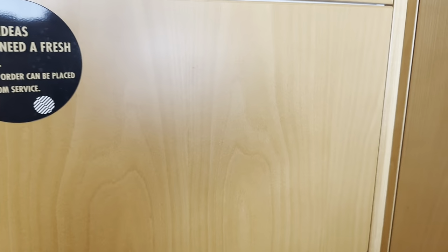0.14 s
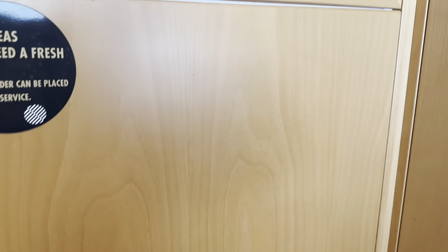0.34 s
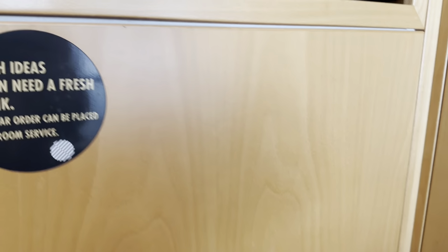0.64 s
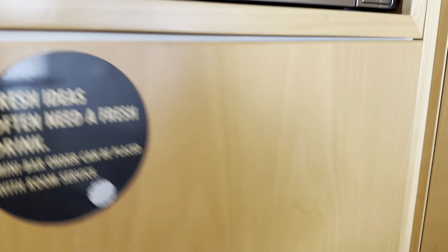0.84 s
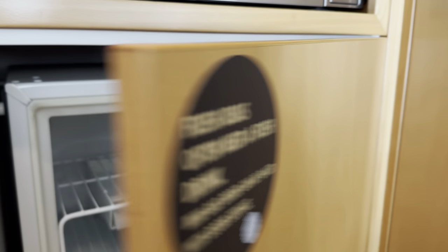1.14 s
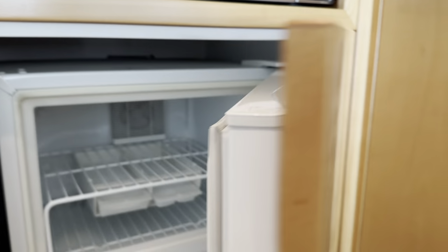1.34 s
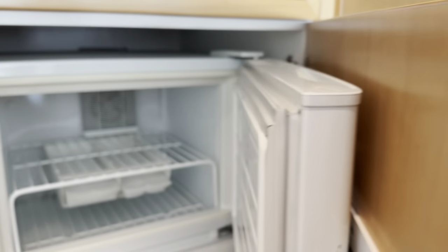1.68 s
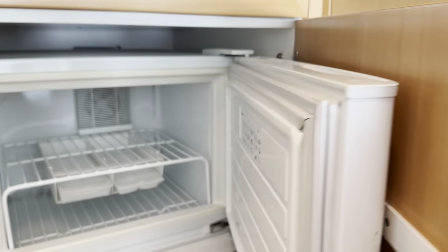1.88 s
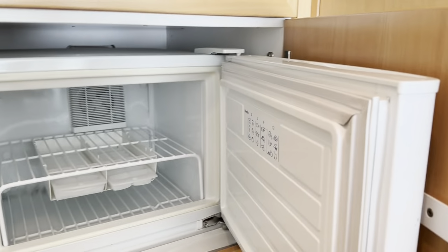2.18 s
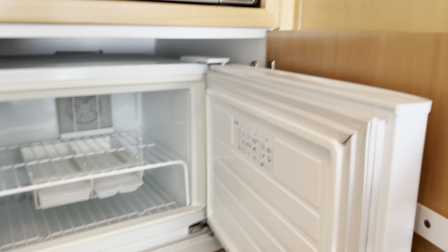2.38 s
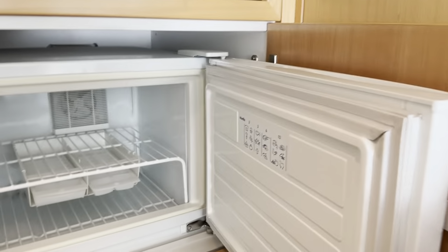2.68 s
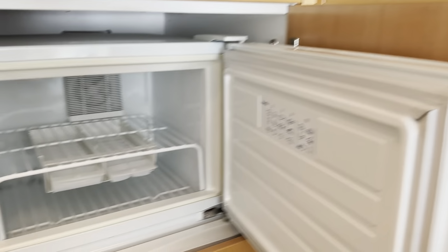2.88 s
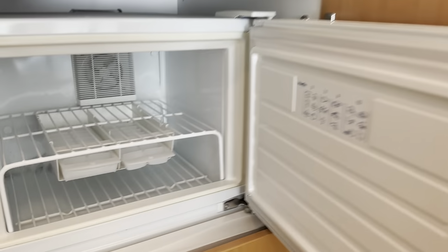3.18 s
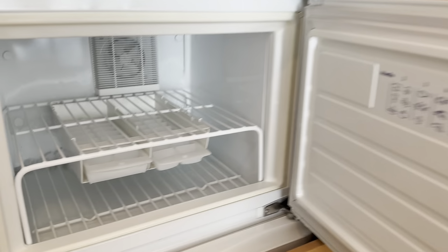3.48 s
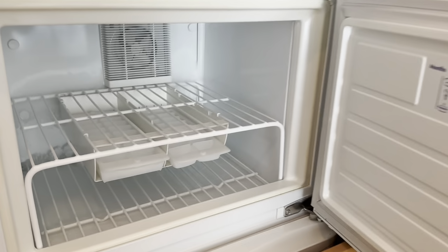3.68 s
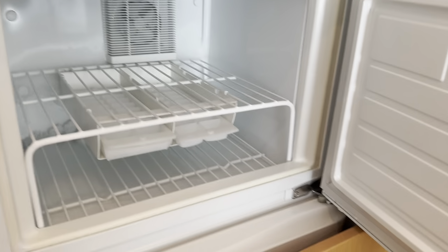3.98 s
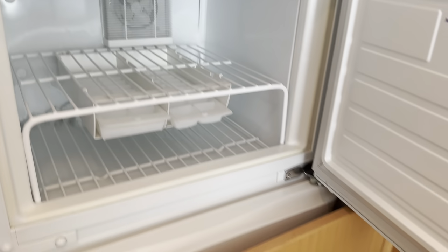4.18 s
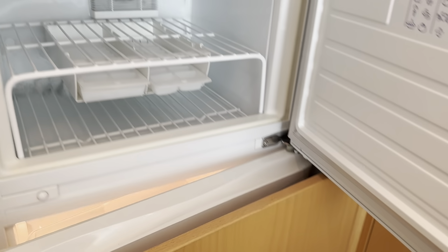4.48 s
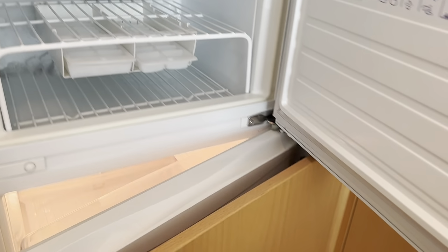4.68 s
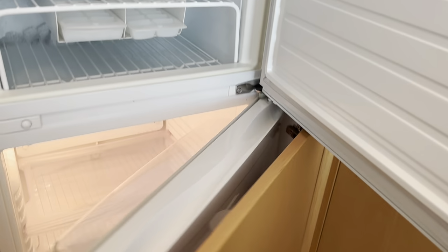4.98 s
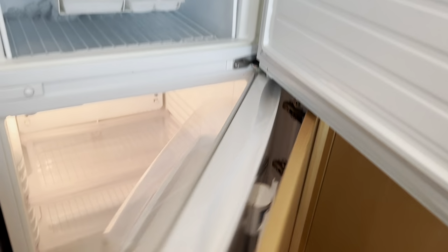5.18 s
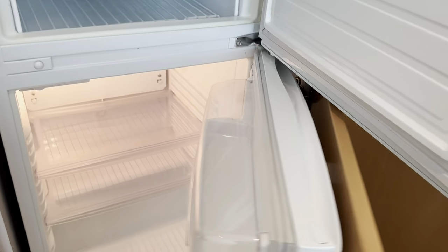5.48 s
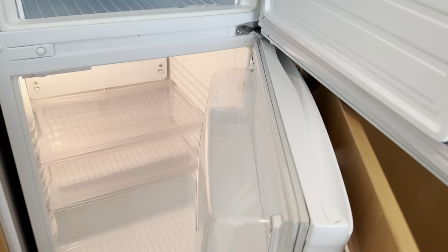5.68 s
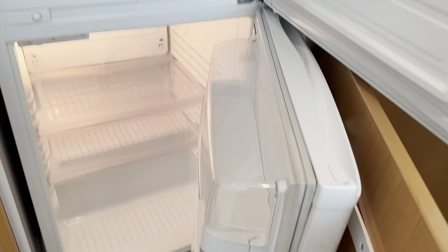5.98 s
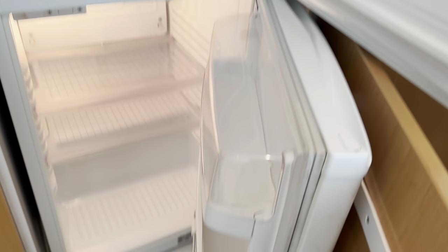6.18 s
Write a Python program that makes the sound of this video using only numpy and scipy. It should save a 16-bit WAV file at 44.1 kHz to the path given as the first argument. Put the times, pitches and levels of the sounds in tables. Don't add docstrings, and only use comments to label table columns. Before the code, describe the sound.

A wooden cabinet door slams and rattles through ever weaker bounces, then hands knock plastic fridge doors and a rubber seal pops open over faint hum.

```python
import sys
import numpy as np
from scipy import signal
from scipy.fft import rfft, irfft, next_fast_len
from scipy.io import wavfile
from scipy.ndimage import uniform_filter1d, map_coordinates

SR = 44100
rng = np.random.default_rng(int(sys.argv[2]) if len(sys.argv) > 2 else 0)


def undo_db(level):
    steps = np.asarray(level, float) / 20
    return 10 ** steps


def put_to_file(sound):
    columns = np.atleast_2d(sound).T
    safe = np.clip(columns, -1, 1)
    whole_steps = np.round(safe * 32767)
    wavfile.write(sys.argv[1], SR, whole_steps.astype(np.int16))


N = 279594
LONG = SR * 3 // 5


def unit(x):
    return x / np.sqrt(np.mean(x ** 2) + 1e-20)


def along(points, hz):
    f, v = np.transpose(points)
    return np.interp(np.log(hz + 1), np.log(f + 1), v)


def wobble(rate):
    knots = rng.standard_normal(int(N * rate / SR) + 4)
    return map_coordinates(knots, [np.arange(N) * rate / SR])


def patches(shape, bands, frames):
    field = uniform_filter1d(rng.standard_normal(shape), size=bands, axis=0)
    return uniform_filter1d(field, size=frames, axis=1)


def filtered(x, response):
    m = next_fast_len(x.shape[-1] + 8192)
    return irfft(rfft(x, m) * response(np.fft.rfftfreq(m, 1 / SR)), m)[..., :x.shape[-1]]


# f/Hz, likeness
ALIKE = [(60, 0.99), (130, 0.93), (290, 0.72), (640, 0.1), (1410, 0.6), (3100, 0.5), (6820, 0.0091),
         (15000, 0.98)]


def ports(pair, gain):
    turn = lambda hz: np.arccos(np.clip(along(ALIKE, hz), -1, 1)) / 2
    mid, side = filtered(pair, lambda hz: gain(hz) * [np.cos(turn(hz)), np.sin(turn(hz))])
    return np.array([mid + side, mid - side])


def rush(spectrum, patchy_db, grain_db=0):
    white = rng.standard_normal((2, N)) * undo_db(grain_db * wobble(900))
    z = signal.stft(white, nperseg=512)[2]
    z = z * undo_db(patchy_db * unit(patches(z.shape[1:], 5, 10)))
    pair = signal.istft(z, nperseg=512)[1][:, :N]
    return unit(ports(pair, lambda hz: undo_db(along(spectrum, hz))))


def decay(t60, rise=.0005):
    t = np.arange(LONG) / SR
    return undo_db(-60 * t / t60) * (1 - np.exp(-t / rise))


def ring(hz, t60, rise):
    t = np.arange(LONG) / SR
    step = rng.normal(0, .7, (2, 1)) * np.arccos(np.clip(along(ALIKE, hz), 0, 1))
    return np.sin(2 * np.pi * hz * t + step) * decay(t60, rise)


def modes(table, rise):
    return sum(undo_db(db) * ring(hz, t60, rise) for hz, db, t60 in table)


def burst(gain, t60, rise=.0005):
    grain = undo_db(4 * np.repeat(rng.standard_normal(LONG // 40 + 1), 40)[:LONG])
    return unit(ports(rng.standard_normal((2, LONG)) * grain, gain)) * decay(t60, rise)


# f/Hz, t60/s
ROOM = [(100, 0.51), (400, 0.35), (1500, 0.18), (4000, 0.24), (12000, 0.88)]
FAR_DB, FAR_TIMES = -12.5, 4.8


def tail(gain, rise):
    diffuse = unit(ports(rng.standard_normal((2, LONG)), gain))
    hz, t, z = signal.stft(diffuse, SR, nperseg=256)
    fall_db = -60 * t / along(ROOM, hz)[:, None]
    far_db = FAR_DB - 8 * hz[:, None] / 10000 + fall_db / FAR_TIMES
    both = undo_db(fall_db) + undo_db(far_db)
    both = both * undo_db(1.8 * unit(patches(both.shape, 2, 6)))
    x = signal.istft(z * both, SR, nperseg=256)[1][:, :LONG]
    return x * decay(99, rise) * np.linspace(1, 0, LONG) ** .5


def add(out, s, x):
    at = round(s * SR)
    out[:, at:at + x.shape[1]] += x


def tilted(spectrum, treble_db, knee_hz):
    return lambda hz: undo_db(along(spectrum, hz) + treble_db / (1 + (knee_hz / (hz + 1)) ** 2.5))


def lumpy(gain, depth_db, width_hz):
    knots = rng.standard_normal(1200)
    return lambda hz: gain(hz) * undo_db(depth_db * np.interp(hz / width_hz, np.arange(len(knots)), knots))


def resonant(peaks):
    band = lambda f, c, w: 1j * f * w / (c * c - f * f + 1j * f * w)
    return lambda f: sum((-1) ** k * undo_db(db) * band(f, c, w) for k, (c, w, db) in enumerate(peaks))


def snap(hz, width_hz, order=2, top=lambda f: 1, apart=2):
    spike = np.zeros((2, 2048))
    spike[[0, 1], [60 + apart, 60]] = 1
    band = lambda f: 1j * f * width_hz / (hz * hz - f * f + 1j * f * width_hz)
    x = filtered(spike, lambda f: top(f) * band(f) ** order)
    return x / np.abs(x).max()


def thump():
    return ring(rng.normal(70, 4), .2, .003) + .7 * ring(rng.normal(118, 5), .3, .005)


def swell(start, length, db, rise=.3, sag_db=5, edge_db=18, release=.1):
    end = start + length
    times = [start - release / 4, start, start + rise * length, end, end + release]
    levels = [db - edge_db - 40, db - edge_db, db, db - sag_db, db - sag_db - 28.5]
    return undo_db(np.interp(np.arange(N) / SR, times, levels, -150, -150))


def glide(from_hz, to_hz, start, length, width_hz):
    hz = np.interp(np.arange(N) / SR, [start, start + length], [from_hz, to_hz])
    turn = 2 * np.pi * np.cumsum(hz) / SR
    band = lambda: wobble(width_hz) * np.cos(turn) + wobble(width_hz) * np.sin(turn)
    return unit(np.array([band(), band()]))


# f/Hz, level/dB
HUM = [(119, -57.5), (237, -61)]


def compressor():
    t = np.arange(N) / SR
    hum = 0
    for hz, db in HUM:
        hum = hum + undo_db(db + 5.7 * wobble(9)) * np.sin(2 * np.pi * (hz * t + 0.057 * wobble(10)))
    return hum * undo_db(-1.2 * (t - 2))


# f/Hz, density level/dB
RUMBLE = [(13, -30), (22, -6), (43, 2), (54, 1.5), (75, -8), (108, -4), (127, -9.5), (141, -16.5),
          (198, -15), (225, -24.5), (361, -36.5), (395, -28.5), (500, -40.5), (650, -69), (1100, -120)]
# f/Hz, density level/dB
MURMUR = [(150, -31.5), (250, -5), (537, -17), (586, -20.5), (616, -16.5), (887, -25.5), (1150, -40.5),
          (1540, -26), (5000, -51), (6500, -87), (11000, -120)]
# t/s, length/s, rumble level/dB, murmur over rumble/dB
SWINGS = [
    (-.1, 0.39, -29, -16),
    (0.573, 0.19, -31.5, -3.5),
    (0.861, .42, -37, -31),
    (2.449, 0.13, -52, -21),
    (3.002, 0.98, -51, -29),
    (3.699, 0.4, -42.5, -11.5),
    (4.194, 0.42, -42.5, -16.5),
    (4.592, 0.96, -50.5, -19),
    (5.457, 0.14, -47, -9.5),
    (5.789, 0.45, -47.5, -31.5),
]
RUMBLE_DB, MURMUR_DB = -47, -66


def room_air():
    stir = lambda s, length, db: swell(s, length, db, rise=0.91, sag_db=9, edge_db=7, release=0.4)
    rumble = undo_db(RUMBLE_DB + 1.3 * wobble(2.3)) + sum(stir(s, n, db) for s, n, db, _ in SWINGS)
    murmur = undo_db(MURMUR_DB) + sum(stir(s, n, db + over_db) for s, n, db, over_db in SWINGS)
    return rumble * rush(RUMBLE, 1.3) + murmur * rush(MURMUR, 1.5)


# f/Hz, density level/dB
SLIDE = [(350, -31.5), (600, 1), (651, -6), (1000, -3.5), (1120, -5), (1800, -8.5), (2450, -9.5),
         (2850, -19), (3700, -25), (7000, -30.5), (9100, -56.5), (15400, -120)]
# f/Hz, density level/dB
HISS = [(1760, -27.5), (3000, 2), (3980, -4), (4450, 0), (6850, -7.5), (8230, -9.5), (9960, -6),
        (10900, -6), (15100, -14.5), (16200, -18)]
# t/s, length/s, rub level/dB, skin hiss level/dB
STROKES = [(-.05, 0.057, -59, -42.5), (0.49, 0.17, -57, -51.5), (1.343, 0.052, -59.5, -102),
           (2.18, 0.28, -62.5, -87.5), (2.598, 0.039, -68, -66.5), (2.867, 0.14, -62, -87.5),
           (3.28, 0.42, -73, -77.5), (3.928, 0.19, -65, -68.5), (4.155, 0.32, -63.5, -67),
           (3.605, 0.17, -76, -91.5), (4.45, 0.5, -86, -88.5), (4.92, 0.23, -75, -74.5),
           (5.551, 0.13, -82, -104)]
# t/s, length/s, level/dB
SETTLE = [
    (1.354, 0.06, -60),
    (4.064, 0.14, -55),
    (4.473, 0.42, -56.5),
    (5.498, 0.15, -72),
]
# t/s, length/s, start f/Hz, end f/Hz, level/dB
HINGE = [
    (0.869, 0.7, 6094, 6930, -70.5),
    (1.0, 0.43, 7200, 7300, -77.5),
    (1.25, 0.44, 5112, 5950, -76),
    (1.66, 0.46, 6050, 6350, -80),
    (1.88, .22, 4200, 4600, -82),
    (1.9, .2, 2450, 2600, -80),
    (2.147, 0.51, 6358, 6500, -82.5),
    (2.33, .25, 7000, 7100, -82),
]
HISS_DB, RUB_DB = -85, -81.5
HINGE_AIR_DB = -4


def hand_and_hinge():
    rub, hiss = undo_db(RUB_DB), undo_db(HISS_DB)
    for s, length, rub_db, hiss_db in STROKES:
        rub = rub + swell(s, length, rub_db, rise=0.46, sag_db=8, edge_db=8, release=0.24)
        hiss = hiss + swell(s, length, hiss_db, rise=0.13, sag_db=6, edge_db=12.5, release=0.42)
    for s, length, db in SETTLE:
        rub = rub + swell(s, length, db, rise=0.044, sag_db=20.0, release=0.3)
    squeal = 0
    for s, length, from_hz, to_hz, db in HINGE:
        turning = swell(s, length, db, rise=0.47, sag_db=6, edge_db=6, release=0.18)
        squeal = squeal + turning * glide(from_hz, to_hz, s, length, width_hz=750)
        hiss = hiss + undo_db(HINGE_AIR_DB) * turning
    squeal = undo_db(2.94 * wobble(14)) * squeal
    skin = unit(filtered(rush(SLIDE, 1.1, 1.8), lumpy(np.ones_like, depth_db=1.3, width_hz=100)))
    return rub * undo_db(1.1 * wobble(29)) * skin + squeal + hiss * undo_db(1.7 * wobble(22)) * rush(HISS, 1.8)


# f/Hz, width/Hz, level/dB
ZIP = [(2040, 250, -3), (2580, 160, 1), (3694, 350, -3), (4360, 200, 0), (5220, 350, -4.5), (6620, 440, -6),
       (7250, 430, -1.5), (11500, 3000, -8)]
# f/Hz, level/dB, t60/s
TRAY = [(291.6, 0, 0.34), (532, -6, 0.25), (684, -4.5, 0.23), (860, -11, 0.19), (1380, -12, 0.12),
        (1900, -12, 0.12), (2120, -10, .1), (2490, -15, .08), (3850, -6, .025), (4050, -19, .07),
        (5250, -20, .05), (5550, -14, 0.09)]
# f/Hz, level/dB, t60/s
CLACK = [(400, -8, .15), (463.4, -6.5, 0.14), (985, 1.5, .12), (1130, -4.5, .06), (1310, -2.5, 0.092),
         (1562, -4.5, 0.07), (1956, -5.5, .07), (2610, -13, .08), (3250, -22, .06)]
# t/s, level/dB
TAPS = [
    (1.7915, -53),
    (1.8625, -51),
]
# f/Hz, level/dB, t60/s
WIRE = [(1000, -8, .12), (1440, 0, .2), (1870, -5, .12)]
ZIP_S, ZIP_LONG_S, ZIP_DB = 4.0198, 0.0093, -36
TRAY_S, TRAY_DB, CLACK_S, CLACK_DB = 5.3478, -34, 3.7685, -16.5


def fittings():
    out = np.zeros((2, N + LONG))
    add(out, TRAY_S, undo_db(TRAY_DB) * modes(TRAY, 0.001))
    add(out, CLACK_S, undo_db(CLACK_DB) * modes(CLACK, 0.00041))
    for s, db in TAPS:
        add(out, s, undo_db(db) * modes(WIRE, .001))
    rasp = swell(ZIP_S, ZIP_LONG_S, ZIP_DB, rise=0.078, sag_db=-3.0, edge_db=28, release=0.055)
    grains = rng.standard_normal((2, N)) * undo_db(4 * wobble(700))
    return out[:, :N] + rasp * unit(filtered(grains, resonant(ZIP)))


# t/s, peak level/dB, f/Hz, treble level/dB
TICKS = [(0.3488, -42.5, 3220, -25), (0.559, -33, 3050, -9), (0.6613, -42, 4600, -8),
         (1.095, -42, 3130, -19), (2.5401, -57.5, 4230, -3), (2.5823, -38.5, 3370, -18),
         (2.7055, -62, 4350, -25), (2.953, -57, 3140, -26), (3.0294, -65, 3030, -24),
         (3.2804, -62.5, 5930, -11), (3.3448, -68, 10760, -5), (3.4453, -60.5, 10600, -12.5),
         (3.5098, -58, 5260, -14), (3.7104, -57, 5975, -6), (3.7601, -34, 4730, -21),
         (3.7645, -35, 5200, -19), (3.7775, -32, 5770, -12), (3.924, -35.5, 12700, -4.5),
         (3.9777, -43.5, 11200, -13), (4.006, -60, 2900, -14), (4.145, -63, 12500, -3),
         (4.1617, -51.5, 11500, -3), (4.251, -57, 4450, -8), (4.1708, -44.5, 10000, -14),
         (4.2058, -42.5, 10200, -17), (4.2257, -47, 10330, -10), (4.275, -49, 9230, -5),
         (4.3001, -56, 10300, 5), (4.392, -28.5, 4460, -15), (4.901, -63, 4980, -10),
         (4.9513, -54, 3220, -14), (5.1095, -54.5, 3240, 3), (5.3474, -34.5, 3900, -6),
         (5.5538, -58, 9600, 4)]
# f/Hz, density level/dB
RUBBER = [(880, -31.5), (1500, -12), (2520, -1), (3130, -8), (4350, -6), (4810, -6.5), (7450, -4),
          (8150, -8.5), (11200, -4.5), (15000, -15), (16200, -19.5)]
TICK_T60 = 0.069
PEEL_S, PEEL_LONG_S = 4.322, 0.063
CRACKLE_DB, DOOR_DB, SUCTION_DB = -44, -32.5, -27
DOOR_LATE_S, SUCTION_LATE_S = 0.0075, 0.048


def seal():
    out = np.zeros((2, N + LONG))
    for s, db, hz, treble_db in TICKS:
        thin = tilted(RUBBER, 1.6 * (treble_db + 8.5), knee_hz=6980)
        colour = lambda f: thin(f) * (1 + 3.5 / (1 + ((f - hz) / (0.031 * hz)) ** 2))
        t60 = TICK_T60 * undo_db(0.2 * (db + 34.5))
        add(out, s, undo_db(db - 4.0) * snap(hz, hz, top=thin))
        body = undo_db(-5) * burst(colour, t60, 0.00012) + undo_db(-37.0) * tail(colour, 0.0057)
        add(out, s + 0.001, undo_db(db) * body)
    crackle = swell(PEEL_S, PEEL_LONG_S, CRACKLE_DB, rise=0.077, sag_db=-8.0, edge_db=29, release=0.048)
    door = swell(PEEL_S, PEEL_LONG_S + DOOR_LATE_S, DOOR_DB, rise=0.83, sag_db=-2.5, edge_db=24, release=0.12)
    suction = swell(PEEL_S, PEEL_LONG_S + SUCTION_LATE_S, SUCTION_DB,
                    rise=0.94, sag_db=5.0, edge_db=25, release=0.13)
    # f/Hz, density level/dB
    shell = [(150, -14.0), (311, -2.5), (360, -3.5), (415, 0.0), (540, -8), (750, -7.0), (1000, -11.5),
             (2000, -24.0), (4000, -58.0)]
    pocket = [(40, -20.0), (80, 1.0), (123, 7.0), (160, -11.5), (210, -3.5), (300, -55)]
    peel = crackle * rush(RUBBER, 0.4, grain_db=2)
    return out[:, :N] + peel + door * rush(shell, 0.83, grain_db=-2.5) + suction * rush(pocket, 0.98)


# t/s, peak level/dB, treble level/dB, ring f/Hz, crack level/dB
KNOCKS = [(0.001, -17, -29, 384, -19.5), (0.041, -23.5, -16, 1500, -16), (0.351, -34.5, -35, 405, -44),
          (1.280, -28, -38, 265, -18), (1.791, -40, -33, 411, -8), (1.863, -46, -33, 1100, -6),
          (2.568, -33.5, -27.5, 1330, -13.5), (2.583, -35.5, -24, 294.5, -33),
          (2.613, -35.5, -33, 486, -26), (2.672, -51.5, -33, 270, -17), (3.063, -53, -38, 668, -18),
          (3.713, -39.5, -38, 517, -21), (3.769, -15, -24.5, 800, -4), (3.778, -19.5, -46, 1220, -30),
               (3.939, -33.5, -61.5, 603, -10.5), (3.978, -33.5, -19.5, 450, -36),
               (4.027, -23, -11, 446, -17), (4.163, -40, -25, 379, -20), (4.393, -24, -16.5, 307, -25.5),
               (4.932, -46, -25, 318, -6), (5.022, -50.5, -28, 290, -14), (5.098, -57, -23, 294, 1),
               (5.348, -33, -9, 375, -23.5), (5.356, -33, -38, 297.4, -33), (5.41, -38, -31, 323, -32),
               (5.476, -32, -30.5, 406, -8), (5.505, -39.5, -41, 304, -20)]
# f/Hz, density level/dB
PLASTIC = [(120, -35.5), (200, -6), (297, -9), (471, -6), (774, -5.5), (967, -3.5), (1760, -10),
           (1990, -7.5), (3050, -18.5), (12000, -47.5), (15600, -79), (22000, -120)]
# multiple of ring f, level/dB
LINER = [(.55, -7), (.8, -5), (1, 10.5), (1.3, 0.5), (1.749, -7.5), (2.301, 2)]
# t/s, level/dB
SHOVES = [
    (2.614, -34.5),
    (3.767, -16),
    (3.98, -36),
    (4.394, -24.5),
]
PUSH_DB = -44.5


def knocks():
    out = np.zeros((2, N + LONG))
    for s, db, treble_db, hz, crack_db in KNOCKS:
        upper = tilted(PLASTIC, treble_db - crack_db + 12.0, knee_hz=3130)
        cracked = lambda f: upper(f) * undo_db((crack_db + 8) / (1 + (800 / (f + 1)) ** 4))
        colour = lumpy(cracked, depth_db=3, width_hz=90)
        liner = 0
        for k, level in LINER:
            gain = undo_db(level + rng.normal(0, 2))
            liner = liner + gain * ring(hz * k * rng.normal(1, 0.024), 45 / (hz * k), 0.00047)
        liner_db = -15.5 - 0.42 * (crack_db + 18) / (1 + (hz / 700) ** 4)
        contact = snap(1300, 1300, top=lambda f: 1 / (1 + (f / 4000) ** 4))
        add(out, s, undo_db(PUSH_DB) * thump())
        add(out, s, undo_db(db + min(crack_db, 0) + 4) * contact)
        body = undo_db(liner_db) * liner + undo_db(-6.5) * burst(colour, 0.15, 0.0026) + undo_db(-17.0) * tail(colour, .008)
        add(out, s + .001, undo_db(db) * body)
    for s, db in SHOVES:
        jolt = thump() + undo_db(-5.0) * ring(237, 0.36, 0.027) + undo_db(-25) * ring(350, 0.14, 0.015)
        add(out, s, undo_db(db) * jolt)
    return out[:, :N]


# t/s, peak level/dB, boom level/dB, treble level/dB
BOUNCES = [
    (0.051, -4, -13, -12.5),
    (0.485, -8.5, -11.5, -14.5),
    (0.72, -13, -15.5, -18.5),
    (0.865, -19.5, -13.5, -20),
    (0.981, -23.5, -12, -19.5),
    (1.074, -31.5, -13, -27),
    (1.148, -29, -16, -32),
    (1.226, -31.5, -12, -25),
    (1.281, -39, -0.5, -19),
]
# f/Hz, density level/dB
PANEL = [(59, -24.5), (100, -5), (255, -18.5), (535, -15), (818, -19), (950, -19), (1420, -12),
         (1580, -19.5), (2320, -20), (7140, -44), (7940, -54.5), (10000, -49.5), (16000, -76)]
# f/Hz, level/dB, t60/s
PANEL_MODES = [(307, -8, 2.8), (517, -6, 0.81), (636, -10, 0.93), (727, -20, 5.0), (962, -3, 0.26),
               (1145, -3, 0.35), (1382, -1, 0.16), (1459, 0, 0.2), (1690, -16, 5.0), (2191, -13, 0.41),
               (2455, -17, 0.19), (2692, -18, 1.1), (3074, -10, 0.22), (4021, -25, 0.41)]
# delay t/s, level/dB
WALLS = [(.0045, -7), (.013, -2), (.019, -5), (.026, -8)]
# f/Hz, width/Hz, level/dB
STOP = [(1500, 540, -2), (2500, 620, -3), (3350, 600, 0), (4907, 760, -8), (5940, 1100, -9),
        (9900, 5000, -13)]


def cabinet():
    out = np.zeros((2, N + LONG))
    for s, db, boom_db, treble_db in BOUNCES:
        wood = lumpy(lambda hz: 1 / (1 + (170 / (hz + 1)) ** 4), depth_db=3, width_hz=45)
        tilt = tilted(PANEL, treble_db + 11.5, knee_hz=4600)
        colour = lambda hz: tilt(hz) * wood(hz)
        dulling = lambda hz: undo_db(2.1 * (treble_db + 10.5) / (1 + (5000 / (hz + 1)) ** 4))
        edge = lambda hz: dulling(hz) * resonant(STOP)(hz)
        click_db = db + 0.2 * (treble_db + 11) + np.array([[5.5], [3]])
        add(out, s, undo_db(click_db) * snap(3500, 9000, 0.23, edge))
        chatter = burst(lambda hz: np.abs(edge(hz)), .035, .0006)
        add(out, s + .0015, undo_db(db - 13.5) * chatter)
        for late, wall_db in WALLS:
            echo = snap(rng.normal(1400, 150), 900, apart=rng.integers(-16, 17))
            add(out, s + late, undo_db(db + wall_db + rng.normal(0, 2, (2, 1))) * echo)
        loose = lambda hz: tilt(hz) * (hz / 3000) / (1 + (2300 / (hz + 1)) ** 4)
        rattle = burst(loose, .1, .002)
        panel = 0
        for hz, level, t60 in PANEL_MODES:
            gain = undo_db(level + rng.normal(0, 1.3))
            panel = panel + gain * ring(hz * rng.normal(1, .02), min(t60, .3) * 0.7, 0.0055)
        boom = ring(63, 0.19, 0.0067) + .6 * ring(82, 0.2, 0.0018) + 0.6 * ring(105, 0.17, .003)
        boom = boom + .2 * ring(185, 0.3, 0.0026) + .15 * ring(243, 0.28, 0.004)
        body = undo_db(-17.5) * rattle + undo_db(-23.5) * ring(388, .5, .01) + undo_db(-13.5) * panel
        body = body + undo_db(-8) * tail(colour, 0.0063) - undo_db(boom_db + 11.5) * boom
        add(out, s + .0012, undo_db(db) * body)
    return out[:, :N]


def scene():
    return compressor() + room_air() + hand_and_hinge() + fittings() + seal() + knocks() + cabinet()


def top_cut(x):
    return signal.sosfilt(signal.butter(12, 16630, fs=SR, output="sos"), x)


# f/Hz, left minus right level/dB
LEAN = [(60, 1.5), (180, 1.5), (550, 3), (1650, -0.5), (4970, 1), (15000, 0.5)]


def record(dry):
    delay = lambda hz: .026 * (100 / (hz + 30)) ** 1.25
    lag = lambda hz: np.exp(-2j * np.pi * np.cumsum(delay(hz)) * hz[1])
    cut = lambda hz: 1 / (1 + (45 / (hz + 1)) ** 6) / (1 + (hz / 15500) ** 90.5)
    side = np.array([[.5], [-.5]])
    spacing = lambda hz: np.exp(2j * np.pi * np.sin(hz / 4000) * side * 0.35)
    lean = lambda hz: undo_db(along(LEAN, hz) * side) * spacing(hz)
    lead = SR // 10
    x = np.pad(dry, ((0, 0), (lead, 0)), "reflect")
    x = filtered(x, lambda hz: lag(hz) * cut(hz) * lean(hz))[:, lead:]
    x = x / (1 + np.abs(x / .95) ** 6) ** (1 / 6)
    return top_cut(x)


dry = scene()
out = record(dry)
put_to_file(out)
```